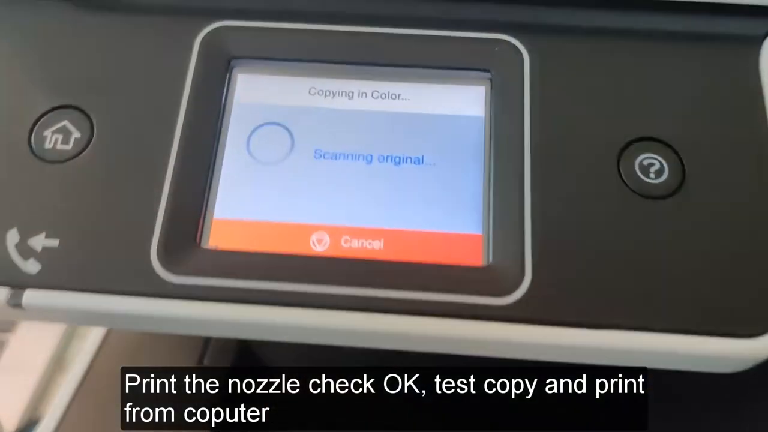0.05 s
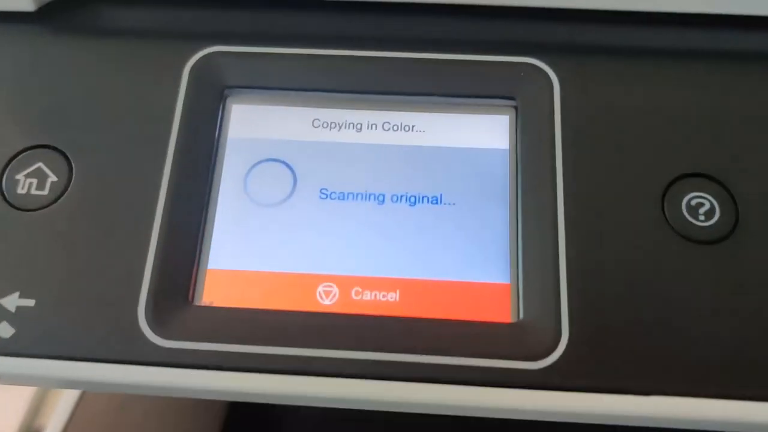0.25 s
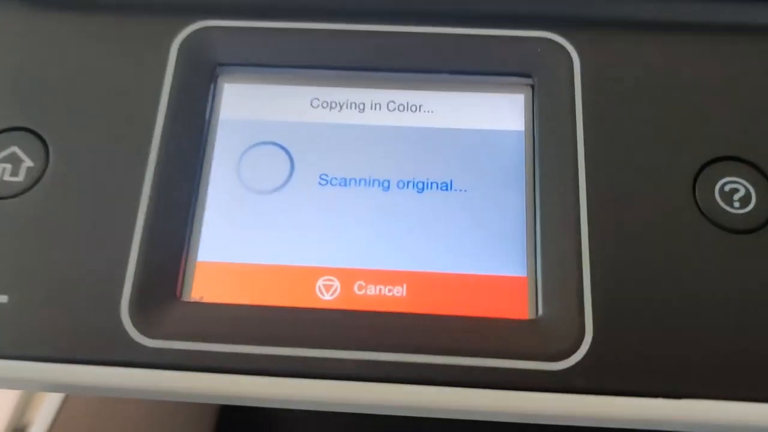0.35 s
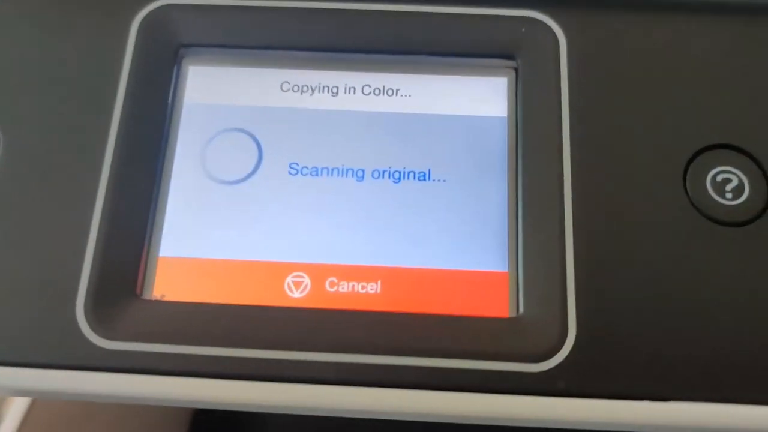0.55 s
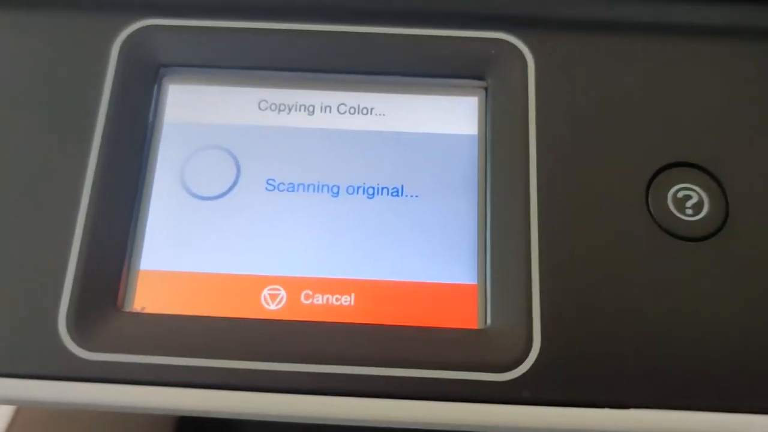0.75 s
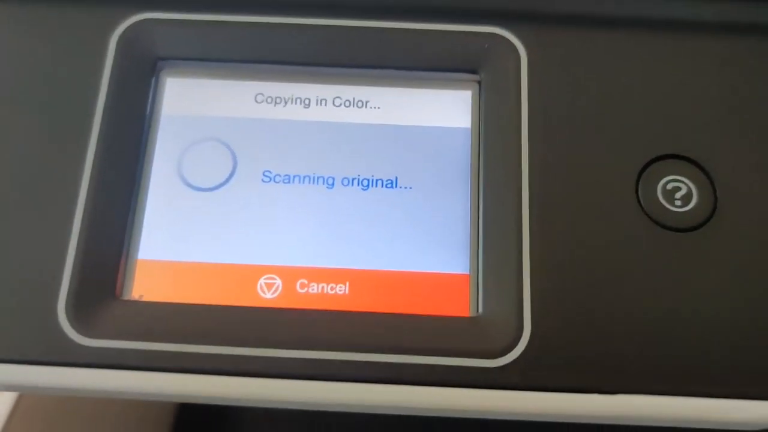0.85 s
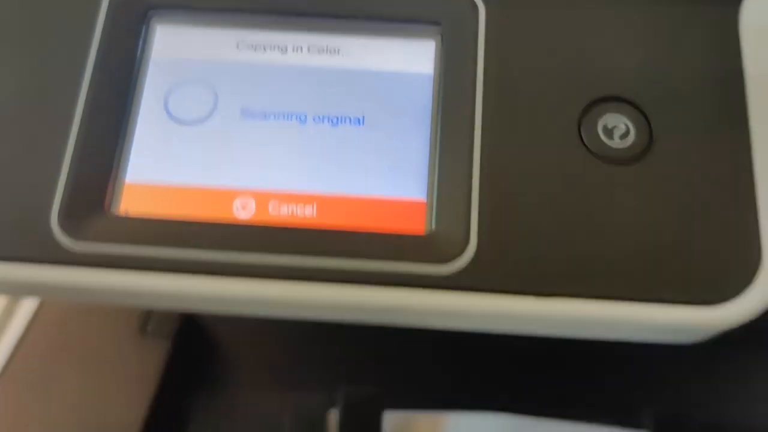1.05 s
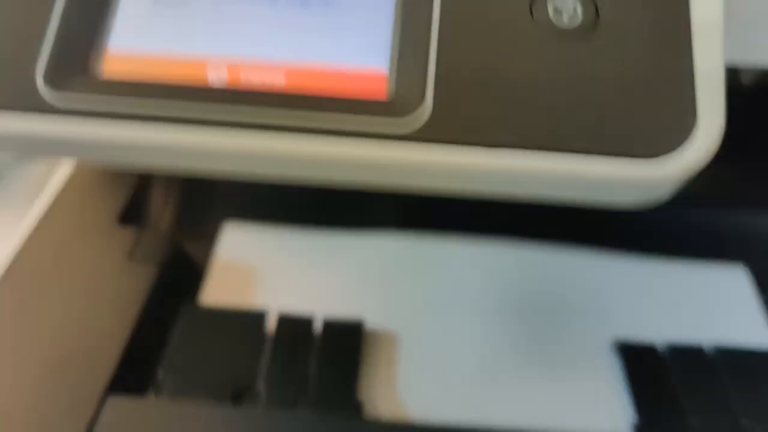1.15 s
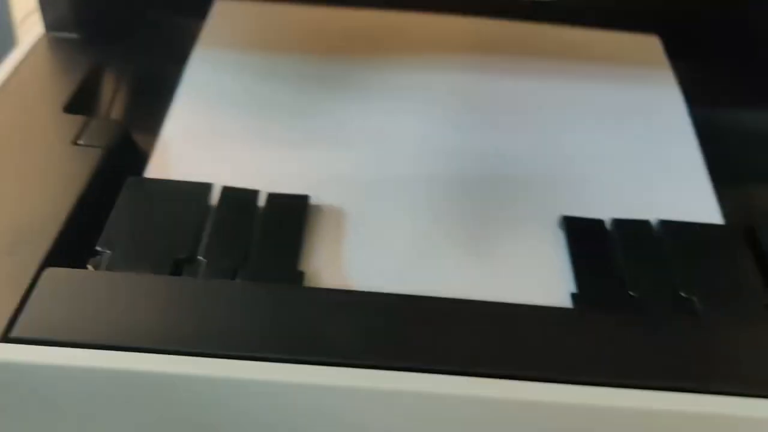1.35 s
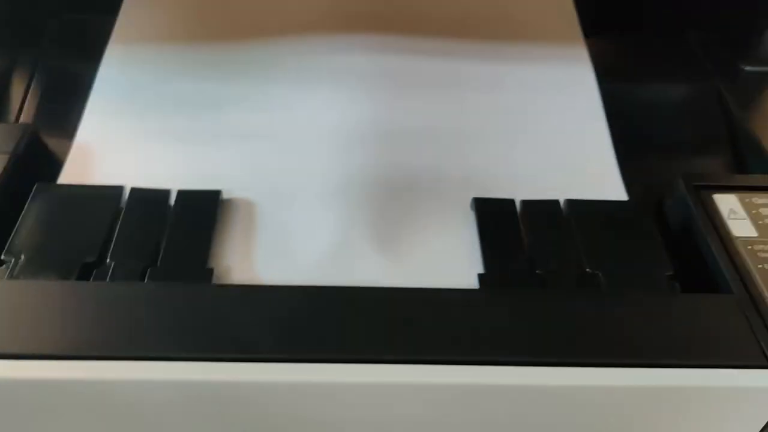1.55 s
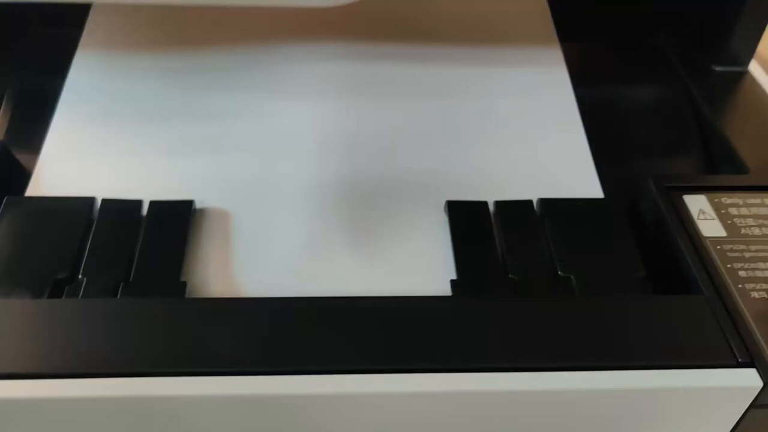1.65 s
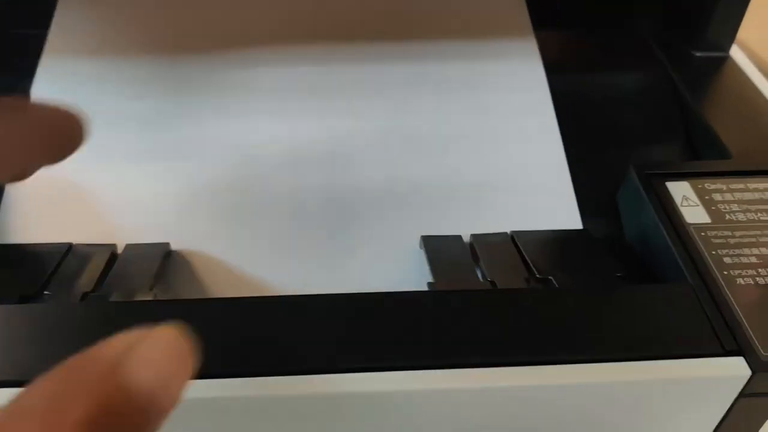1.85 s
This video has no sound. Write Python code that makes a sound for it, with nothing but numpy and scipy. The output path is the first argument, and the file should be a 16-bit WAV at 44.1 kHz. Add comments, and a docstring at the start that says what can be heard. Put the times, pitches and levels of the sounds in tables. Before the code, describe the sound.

A printer's paper feed whirs and rattles in two pushes, clicks to a stop, then hums quietly

```python
"""Inkjet printer feeding paper

A printer stands in a room and is heard through a phone's two microphones. Thin motor hums lie under
two pushes of the paper feed: rattling gears, a singing motor and rustling paper. A click stops the feed
and a slow motor hums on. Gears, paper and clicks are filtered noise, motors are wavering sines, and
a finger bumping the left microphone is a short push with a swing back."""
import sys
import numpy as np
from scipy import signal
from scipy.fft import rfft, irfft
from scipy.io import wavfile
from scipy.ndimage import uniform_filter1d, map_coordinates

SR = 44100
rng = np.random.default_rng(int(sys.argv[2]) if len(sys.argv) > 2 else 0)


def pcm_store(signal):
    """Save signal as 16-bit PCM."""
    levels = np.round(np.clip(np.atleast_2d(signal), -1, 1) * 32767)
    wavfile.write(sys.argv[1], SR, levels.astype(np.int16).T)


N = 83790  # length of the scene [samples]


def undb(db):
    """Turns decibels into a plain factor."""
    return 10 ** (np.asarray(db) / 20)


def curve(table, axis=1):
    """Draws straight lines between the rows of a table column over time."""
    rows = np.array(table)
    return np.interp(np.arange(N) / SR, rows[:, 0], rows[:, axis])


def over_hz(table):
    """Spreads a (frequency, value) table over the FFT bins, along a logarithmic pitch axis."""
    rows = np.array(table)
    hz = np.arange(N // 2 + 1) * SR / N
    return np.interp(np.log(hz + 1), np.log(rows[:, 0]), rows[:, 1])


def unit(x):
    """Scales the whole sound to an rms of 1."""
    return x / np.sqrt(np.mean(x ** 2))


def peak(x):
    """Scales each row to a peak of 1."""
    return x / np.abs(x).max(axis=-1, keepdims=True)


def colour(x, table):
    """Shapes the spectrum of x by the table and fades it out beyond both ends."""
    hz = np.arange(N // 2 + 1) * SR / N
    low_edge = 1 / (1 + (table[0][0] / (hz + 1)) ** 6)
    high_edge = 1 / (1 + (hz / table[-1][0]) ** 6)
    return irfft(rfft(x) * undb(over_hz(table)) * low_edge * high_edge, N)


def band(x, hz, width):
    """Lets through one resonance of the given width [Hz]."""
    return signal.lfilter(*signal.iirpeak(min(hz, .45 * SR), hz / width, fs=SR), x)


def walk(rate):
    """Makes a smooth random wander: levels held for 1 / rate seconds, smoothed twice, spread near 1."""
    hold = int(SR / rate)
    steps = np.repeat(rng.standard_normal(N // hold + 1), hold)
    return 1.29 * uniform_filter1d(uniform_filter1d(steps, hold), hold)[:N]


def drift(x, share):
    """Lets a resonance wander in pitch by reading it a little faster or slower."""
    at = np.clip(np.cumsum(1 + share * walk(14)), 0, N - 1)
    return np.array([map_coordinates(row, [at], order=3) for row in x])


def grit(spread_db):
    """Makes two draws of dense tiny knocks of uneven size."""
    return rng.standard_normal((2, N)) * undb(spread_db * rng.exponential(size=N))


# How much louder the left microphone is than the right: (frequency [Hz], difference [dB])
LEFT_OVER_RIGHT = [(60, 5), (110, 1.5), (200, 0), (380, 1.5), (700, 3.5), (1290, 1.5), (2380, -9),
                   (4400, 1), (8120, -11.5), (15000, 0.5)]
# How alike the two microphones hear a sound: (frequency [Hz], likeness [0-1])
ALIKE = [(60, 1), (500, 0.92), (1000, 0.64), (2000, 0), (4000, 0), (12000, 0.2)]


def ports(a, b):
    """Mixes two versions of a sound for the two microphone openings: most alike in the bass, tilted."""
    likeness = np.clip(over_hz(ALIKE), 0, 1)
    tilt = undb(over_hz(LEFT_OVER_RIGHT) / 2)  # half the difference goes to each side
    mid = rfft(a) * np.sqrt(1 + likeness)
    side = rfft(b) * np.sqrt(1 - likeness)
    return irfft(np.array([(mid + side) * tilt, (mid - side) / tilt]), N) / np.sqrt(2)


# Bass rumble: (time [s], level [dB])
RUMBLE = [(0.0, -74.5), (0.412, -69), (0.66, -66), (1.804, -71.5), (1.9, -75)]


def rumble():
    """Deep room rumble: noise kept between 40 and 160 Hz."""
    low = signal.lfilter(*signal.butter(2, [40., 160.], "band", fs=SR), rng.standard_normal((2, N)))
    return ports(*unit(low)) * undb(curve(RUMBLE))


# Spectrum of the room and idling machine: (frequency [Hz], relative level per Hz [dB])
ROOM = [(60, -13.5), (120, -14.5), (190, -3), (400, -9), (750, -9), (1150, -11), (1800, -17.5), (2550, -10),
        (3200, -20.5), (4200, -28), (5000, -20), (6200, -30.5), (10000, -34), (13500, -36.5)]
# Room and idling machine: (time [s], level [dB])
IDLE = [(0, -65.5), (.17, -66.5), (.3, -56), (1.2, -59), (1.45, -62.5), (1.9, -63.5)]


def room():
    """The room and the idling machine: coloured noise whose level wanders a little."""
    noise = unit(colour(rng.standard_normal((2, N)), ROOM))
    return ports(*noise) * undb(curve(IDLE) + 1.9 * walk(11.98))


def echo(dry_printer):
    """The room answers with many dense reflections: noise that dies away, starting after 4 ms."""
    level_db, t60_s = -16, 0.37
    t = np.arange(int(.3 * SR)) / SR
    tail = rng.standard_normal((2, len(t))) * undb(-60 * t / t60_s) * (t > .004)
    tail = tail / np.sqrt(np.sum(tail[0] ** 2))
    return undb(level_db) * signal.fftconvolve(dry_printer, tail, axes=1)[:, :N]


def tone(hz, waver, flicker_db):
    """A motor line: a sine, rms 1 before its flicker, that wavers a little in pitch."""
    phase = 2 * np.pi * (np.cumsum(hz * (1 + waver * walk(30.04))) / SR + rng.random())
    return np.sqrt(2) * np.sin(phase) * undb(flicker_db * walk(23))


def stack(lines):
    """Adds up thin motor lines; the higher ones flicker more."""
    return sum(undb(db) * tone(hz, waver=0.00082, flicker_db=1.5 + hz / 1240.0) for hz, db in lines)


# The singing feed motor: (time [s], level [dB])
WHINE = [(0.18, -65), (0.225, -52.5), (0.444, -53), (0.49, -42.5), (0.558, -60.5), (0.63, -50.5),
         (0.652, -78), (0.686, -52.5), (0.764, -45.5), (0.81, -51), (0.886, -38), (0.94, -85)]


def feed_motor():
    """The feed motor sings: a wavering tone with a rough band of noise around it."""
    hz, rough_db = 528.4, -9.5
    t = np.arange(N) / SR
    rough = unit(band(band(rng.standard_normal(N), hz * 1.074, 95), hz * 0.973, 100))
    whine = tone(hz, waver=0.006, flicker_db=-1.0) + undb(rough_db) * rough
    running = (t > WHINE[0][0]) * (t < WHINE[-1][0])
    return undb(curve(WHINE)) * running * whine


# Lines that hum throughout: (frequency [Hz], rms level before flicker [dB])
HUM = [(190, -75), (603, -77.5)]
# Early scanner motor: (frequency [Hz], rms level before flicker [dB])
SCANNER = [(253, -77), (705, -79.5), (759, -76.5), (2369, -79)]
# Slow motor, multiples 3 to 17 of its base frequency: rms level before flicker [dB]
SLOW_MOTOR = [-68, -77.5, -81, -74.5, -77, -103, -72, -75, -84, -72.5, -77.5, -83, -72.5, -96, -82]
# Higher lines of the slow motor: (frequency [Hz], rms level before flicker [dB])
SLOW_HIGH = [(1604, -78.5), (2632, -78.5)]


def motors():
    """The feed motor sings over the thin steady lines of the scanner motor and the slow motor."""
    scanner_ends_s, slow_starts_s, fade_s = 0.33, 0.75, 0.15
    slow_hz = 76.33  # base frequency
    t = np.arange(N) / SR
    scanner = stack(SCANNER) * np.clip((scanner_ends_s - t) / fade_s, 0, 1)
    multiples = slow_hz * (3 + np.arange(len(SLOW_MOTOR)))
    slow = stack(zip(multiples, SLOW_MOTOR)) + stack(SLOW_HIGH)
    slow = slow * np.clip((t - slow_starts_s) / fade_s, 0, 1)
    out = feed_motor() + stack(HUM) + scanner + slow
    return ports(out, np.roll(out, 40))  # a shifted copy sets the two sides apart


def bump():
    """A finger pushes the left microphone briefly; the membrane swings back and settles."""
    start_s, push_s, swing_s = .2407, .0028, .0033
    level_db, right_db, swing_db = -20, -16, -10  # right is relative to left, swing to the push
    t = np.arange(N) / SR - start_s
    push = np.sqrt(np.clip(np.sin(np.pi * np.clip(t / push_s, 0, 1)), 0, 1))
    back = np.clip(t - push_s, 0, None) / swing_s
    swing = undb(swing_db) * back * np.exp(1 - back)
    thud = uniform_filter1d(push - swing, size=15)  # rounds the corners
    thud = signal.lfilter(*signal.butter(1, 42, "high", fs=SR), thud)
    return undb(level_db) * thud * np.array([[1], [undb(right_db)]])


# Plastic parts that the clicks ring: (frequency [Hz], relative level [dB], time to fall 60 dB [s])
PARTS = [(1450, -5, .035), (2440, 3, .035), (2600, 0, .04), (3817, -12, .03), (4980, -3, .02),
         (6000, -6, .015), (7700, -8, .012)]


def ring_parts(noise, t, hz, attack):
    """A short rattle sets the plastic parts ringing, most of all those near the click's own pitch."""
    rattle = noise * np.exp(-t / (0.00069 + attack))
    total = 0
    for part_hz, db, t60 in PARTS:
        decay = np.sin(2 * np.pi * part_hz * t) * undb(-60 * t / t60)
        ring = signal.fftconvolve(rattle, [decay], axes=1)[:, :len(t)]
        nearness = 1 / (1 + 2 * np.log2(part_hz / hz) ** 2)
        total = total + undb(db) * peak(ring) * nearness
    return total


# Latches and paper edges, and a low knock as the feed motor's whine ends (0.868 s): (time [s], level [dB],
# centre frequency [Hz], attack [s], # time to fall 60 dB [s], ring of the parts against the crack [dB])
CLICKS = [(.088, -62, 2400, .002, .03, 4), (.185, -54, 1800, .0005, 0.033, 0),
          (.264, -47, 3320, .002, .03, -6), (.437, -35, 1580, 0.007, .06, 0),
          (.478, -42, 4950, 0.0072, 0.051, 0), (.575, -38.5, 4550, .012, 0.092, 0),
          (.868, -36.5, 585, 0.0048, 0.14, -6), (.923, -41, 2400, 0.004, 0.046, 7),
          (1.180, -32.5, 8500, 0.00073, 0.042, -3), (1.2543, -31, 2800, 0.0005, 0.06, 1),
          (1.2546, -33, 7000, .0005, 0.052, -2), (1.262, -43.5, 296, 0.0026, 0.24, -10),
          (1.8113, -52, 3200, 0.0003, 0.006, -20)]


def clicks():
    """Latches, paper edges and a low knock where the whine ends: a crack of noise in a broad band that also
    rings the plastic parts."""
    out = np.zeros((2, N))
    t = np.arange(4000) / SR
    for start, db, hz, attack, t60, ring_db in CLICKS:
        noise = rng.standard_normal((2, len(t))) * np.clip(t / attack, 0, 1)
        crack = band(band(noise * undb(-60 * t / t60), hz, 1.1 * hz), hz, 1.1 * hz)
        hit = peak(crack) + undb(ring_db) * peak(ring_parts(noise, t, hz, attack))
        i = int(start * SR)
        n = min(len(t), N - i)
        out[:, i:i + n] += undb(db) * hit[:, :n]
    return ports(*signal.lfilter(*signal.butter(2, 12500., fs=SR), out))


# Spectrum of the rustle: (frequency [Hz], relative level per Hz [dB])
PAPER = [(3000, -26), (3350, 4), (4100, -4), (5050, 0), (5900, -5.5), (7500, -7), (9000, -13), (11000, -14),
         (14000, -13.5), (15200, -30)]
# Late faint rustle: (time [s], level [dB])
SLIDE = [(1.74, -90), (1.79, -66.5), (1.82, -69.5), (1.9, -76.5)]


def paper(level_db):
    """The sheet hisses over rollers and guides; its lower and upper treble swell apart."""
    hiss = unit(colour(grit(spread_db=1.5) * undb(0.52 * walk(25.0)), PAPER))
    low = signal.filtfilt(*signal.butter(2, 6000., fs=SR), hiss)
    high = hiss - low
    return ports(*(low * undb(0.52 * walk(10.2)) + high * undb(0.82 * walk(7)))) * undb(level_db)


# The feed's two pushes: (time [s], level of gears and case [dB], level of the paper rustle [dB],
# level of the narrow buzz [dB])
FEED = [(.183, -83, -85, -86), (.187, -65, -78, -76), (.205, -52.5, -65, -80), (.23, -47, -60.5, -72),
        (.33, -44, -58.5, -55), (.425, -44.5, -59.5, -54.5), (.45, -44.5, -53, -53), (.55, -43, -53.5, -60),
        (.585, -40.5, -49.5, -62), (.65, -44.5, -52.5, -58), (.73, -43.5, -53.5, -56.5),
        (.82, -44, -51.5, -52), (.915, -48.5, -54.5, -57), (.945, -48, -53.5, -49.5),
        (.975, -50.5, -57, -63), (1.01, -60.5, -72, -83), (1.055, -45.5, -52.5, -59),
        (1.125, -45.5, -54.5, -46), (1.156, -47.5, -53.5, -68), (1.185, -45, -51.5, -49.5),
        (1.245, -48, -57.5, -55), (1.29, -56, -60.5, -61), (1.33, -61.5, -65.5, -79), (1.42, -82, -77, -92)]
# Spectrum of the case: (frequency [Hz], relative level per Hz [dB])
CASE = [(150, -16.5), (280, -7.5), (430, -11), (560, -3.5), (800, -6.5), (1100, -10), (1680, -8.5),
        (2150, -8.5), (2500, -5), (3050, -9.5), (5000, -31.5)]
# Resonances of the case: (frequency [Hz], width [Hz], level relative to each other [dB])
RINGS = [(695, 120, -9.5), (987, 60, -10.5), (1445, 114, -7), (2388, 180, -3.5), (2532, 170, -6)]


def gears():
    """Gear teeth and belt shake the case; each resonance flickers and drifts by itself."""
    rings_db, flicker_db = -5, 1.3  # all rings against the body; flicker of each ring
    buzz_hz, buzz_width = 1270, 64  # [Hz]
    knocks = grit(spread_db=2.0) * undb(1.1 * walk(91.06))
    body = unit(colour(knocks, CASE))
    rings = 0
    for hz, width, db in RINGS:
        ring = unit(band(band(knocks, hz, width), hz, 2.1 * width))
        rings = rings + undb(db + flicker_db * walk(55.8)) * drift(ring, share=.012)
    buzz = unit(band(band(knocks, buzz_hz, buzz_width), buzz_hz, 2 * buzz_width))
    buzz = drift(buzz, share=0.00778) * undb(curve(FEED, axis=3))
    rattle = unit(body + undb(rings_db) * rings)
    return ports(*rattle) * undb(curve(FEED)) + ports(*buzz)


def scene():
    """Adds the room, the motors and the bump to the printer and its echo."""
    printer = gears() + paper(curve(FEED, axis=2)) + paper(curve(SLIDE)) + clicks()
    return printer + echo(printer) + motors() + room() + rumble() + bump()


def record(dry):
    """The phone cuts the treble steeply above 15400 Hz."""
    return signal.sosfilt(signal.ellip(8, .2, 70, 15400, fs=SR, output="sos"), dry)


dry = scene()
out = record(dry)
pcm_store(out)
```